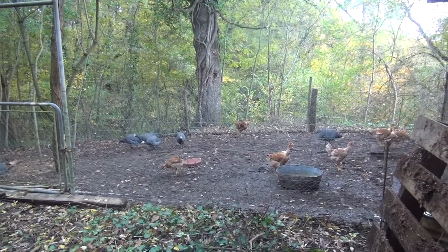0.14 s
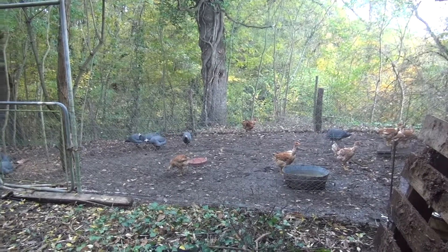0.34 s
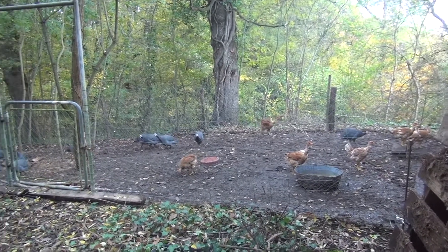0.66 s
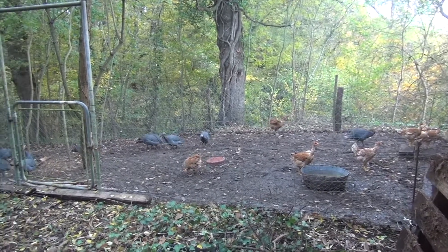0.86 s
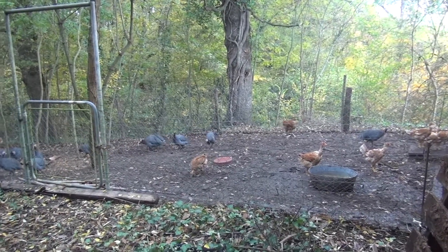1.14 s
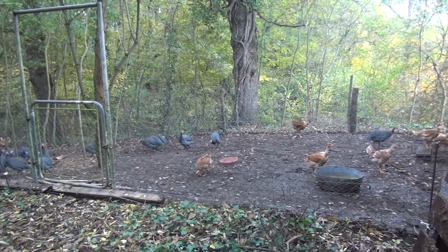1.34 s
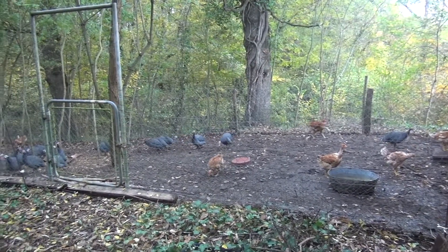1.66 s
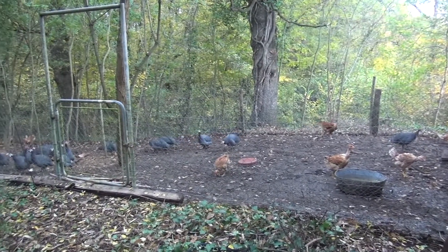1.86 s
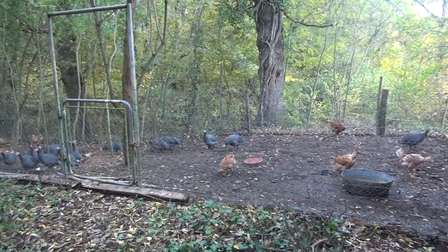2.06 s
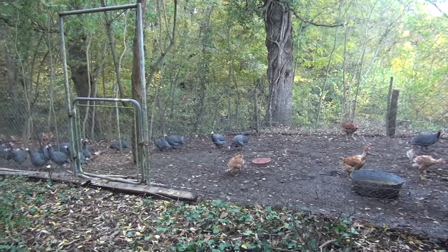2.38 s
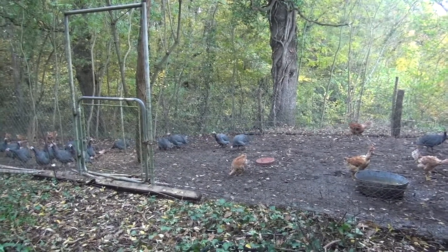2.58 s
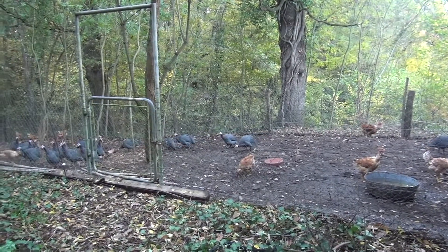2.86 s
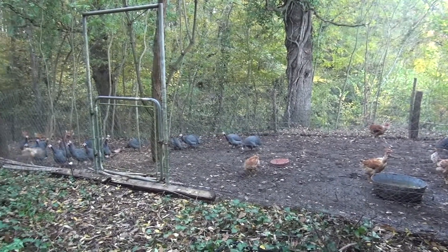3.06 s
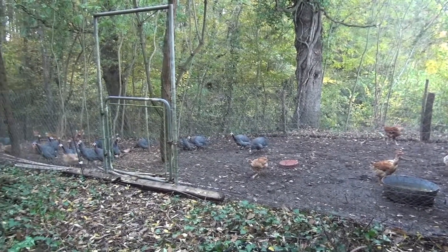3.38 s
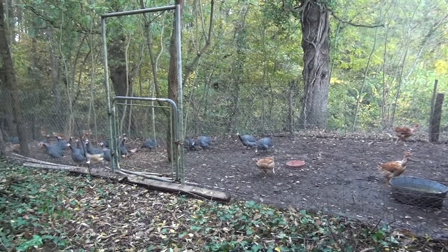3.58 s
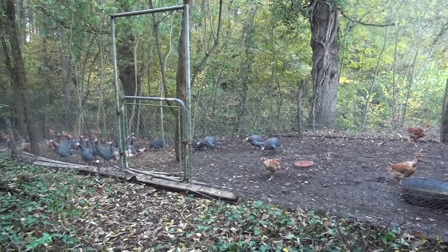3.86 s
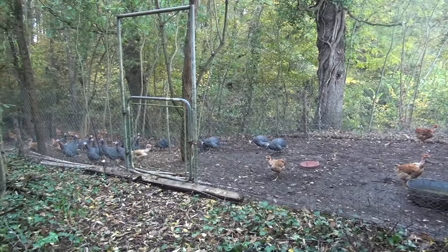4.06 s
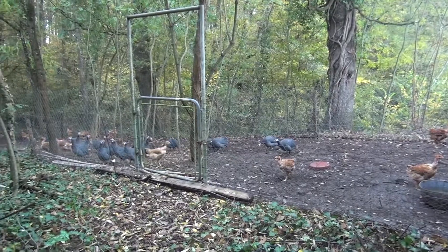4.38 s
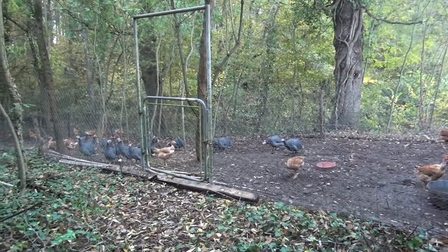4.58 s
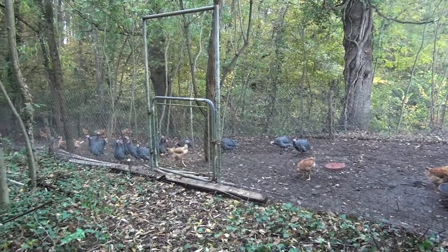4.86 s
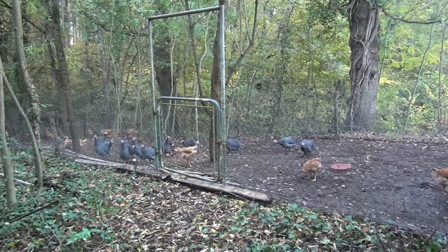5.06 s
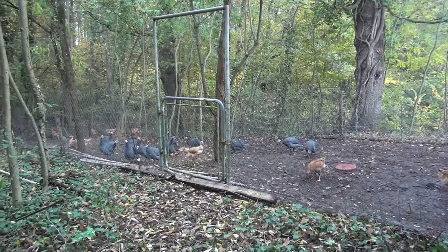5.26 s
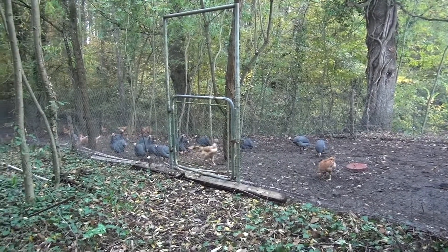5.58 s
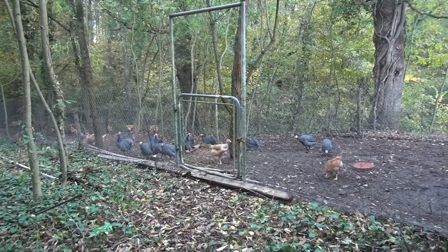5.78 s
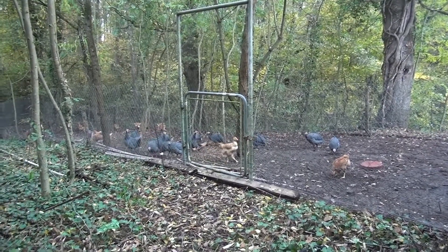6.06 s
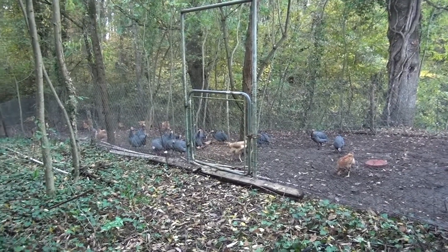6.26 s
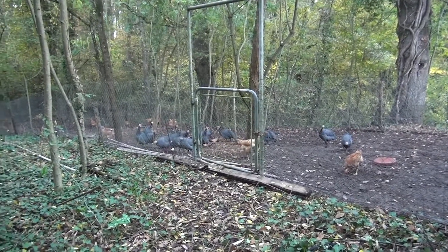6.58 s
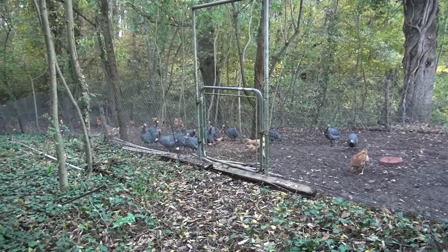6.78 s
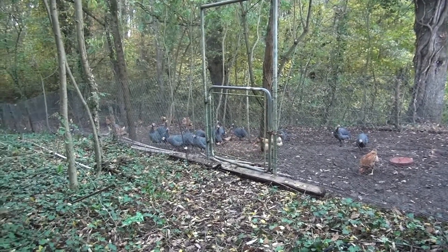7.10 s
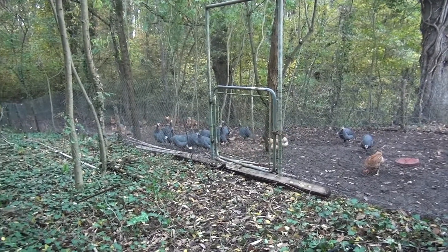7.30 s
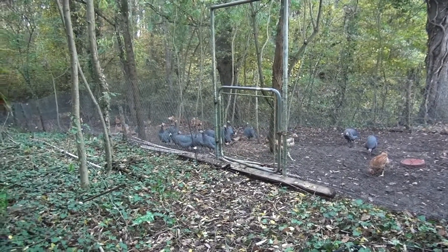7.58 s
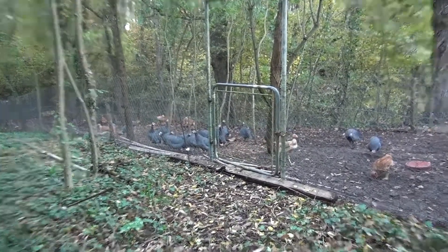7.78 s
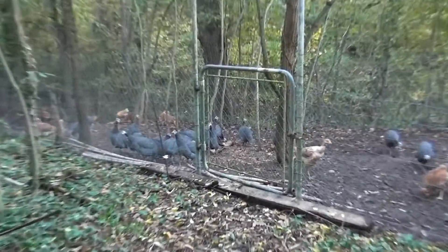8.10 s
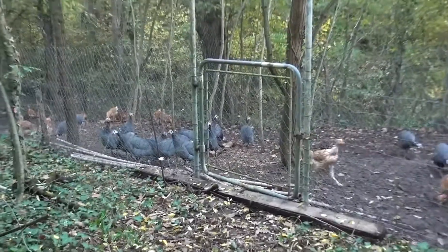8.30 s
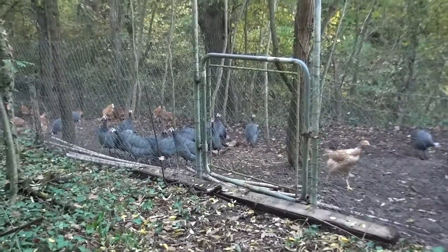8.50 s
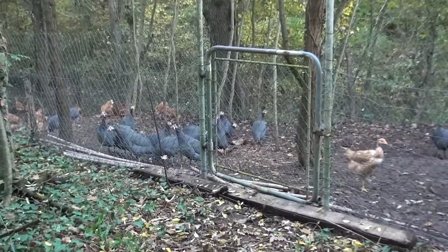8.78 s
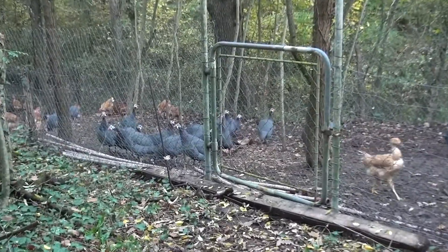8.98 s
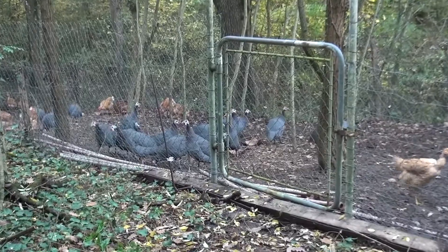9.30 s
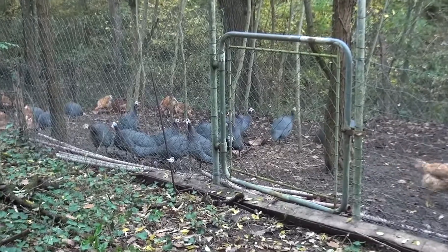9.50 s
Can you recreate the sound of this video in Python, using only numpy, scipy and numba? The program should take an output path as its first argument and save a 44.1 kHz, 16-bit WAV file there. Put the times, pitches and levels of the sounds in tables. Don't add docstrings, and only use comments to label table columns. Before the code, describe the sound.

In a leafy outdoor pen, a guineafowl repeats a sharp, grating chatter almost without stopping, taking only a slightly longer gap near the middle. Gusts flutter against the microphone at the start, then die away. The cries dominate, held to an even loudness, with short reverberation from trunks and a faint wall slap, above quiet far traffic and airy hiss.

```python
import sys
import numpy as np
from scipy import signal
from scipy.fft import rfft, irfft, next_fast_len
from scipy.io import wavfile
from scipy.ndimage import uniform_filter1d
from numba import njit

SR = 44100
rng = np.random.default_rng(int(sys.argv[2]) if len(sys.argv) > 2 else 0)


def store_wav(level_fs):
    pcm = np.round(np.clip(np.atleast_2d(level_fs), -1, 1) * 32767)
    wavfile.write(sys.argv[1], SR, pcm.T.astype(np.int16))


def gain_from_db(level_db):
    decades = np.asarray(level_db, float) / 20
    return 10 ** decades


N = 425124

# start in seconds, level in dB, length in seconds,
# pulse rate in Hz, whistle level in dB.
FIRST_BOUT = [(-0.045, -15.5, 0.053, 300.2, -5), (0.179, -14.5, 0.055, 308.2, -6),
              (0.416, -14.5, 0.059, 311, -5), (0.635, -13.5, 0.058, 313.3, -4),
              (0.882, -15, 0.067, 308.3, -7), (1.144, -12.5, 0.06, 309.2, -10),
              (1.3607, -13, 0.058, 307.4, -8), (1.5814, -11.5, 0.062, 310.8, -8),
              (1.8166, -11.5, 0.063, 310.8, -12), (2.0514, -13, 0.072, 300, -12),
              (2.2665, -14.5, 0.067, 303.7, -8.5), (2.4943, -13.5, 0.066, 300.4, -10),
              (2.75, -12.5, 0.074, 309.2, -8), (2.99, -14.5, 0.064, 307, -16),
              (3.2408, -13, 0.066, 303.3, -10), (3.5442, -12.5, 0.06, 319.3, -7.5)]
# the same columns, in seconds, dB, seconds, Hz and dB.
SECOND_BOUT = [(3.8853, -14, 0.063, 314.8, -5.5), (4.1402, -13.5, 0.06, 312.8, -8),
               (4.42, -13, 0.063, 313.8, -6.5), (4.6806, -12, 0.061, 308.5, -10),
               (4.9147, -11, 0.065, 307.2, -9), (5.1268, -13, 0.069, 308.5, -5),
               (5.4002, -12.5, 0.07, 302.1, -10.5), (5.6396, -14.5, 0.07, 304.2, -5.5),
               (5.853, -14, 0.074, 299.6, -9.5), (6.076, -16, 0.074, 301, -10.5),
               (6.2937, -15.5, 0.076, 307.5, -12), (6.525, -16.5, 0.071, 316.6, -5),
               (6.7658, -15.5, 0.067, 303.3, -10), (7.0085, -16.5, 0.07, 315.8, -7),
               (7.2448, -17, 0.067, 315.5, -4.5), (7.4697, -17, 0.067, 314.5, -3.5),
               (7.7182, -17.5, 0.075, 312.3, -5), (7.9537, -17, 0.071, 315.9, -4),
               (8.1932, -18.5, 0.07, 313.4, -1.5), (8.425, -16.5, 0.062, 306.3, -11),
               (8.7182, -15, 0.059, 316.4, -6.5), (8.9943, -15, 0.066, 309.2, -6.5),
               (9.2828, -15, 0.071, 294.1, -6), (9.5635, -17, 0.063, 311.8, -9)]


def guineafowl():
    out = np.zeros(next_fast_len(N + SR * 5 // 4, True))
    first_start, *first_cry = FIRST_BOUT[0]
    earlier = [(first_start - .23 * k, *first_cry) for k in range(1, 4)]
    cries = earlier + list(FIRST_BOUT) + list(SECOND_BOUT)
    for row, chance in zip(cries, rng.standard_normal((len(cries), 9))):
        sound = cry(*row, chance)
        begin = SR + round(row[0] * SR) - SR // 32
        out[begin:begin + len(sound)] += sound
    return out


# time in seconds, turn towards the microphone from 0 to 1,
# beak opening in dB, whistle pitch in Hz.
HEAD = [(.18, 0.3, -3, 1345), (.64, 0.03, -2, 1349), (.88, 0.22, 0.5, 1408), (1.14, 0.26, -1.5, 1404),
        (1.36, .4, -1.5, 1344), (1.82, 0.67, -2.8, 1428), (2.27, 0.32, -2.2, 1418),
        (2.75, 0.39, -2.5, 1410), (3.24, 0.47, -2, 1390), (3.7, 0.37, 1, 1417), (4.14, 0.27, -1.5, 1425),
        (4.68, 0.62, -3, 1450), (5.4, 0.54, -2.4, 1405), (6.29, 1.02, -3.4, 1440), (6.77, 0.89, -2, 1407),
        (8.19, 1, -6, 1438), (8.43, 0.78, -1.5, 1419), (9.56, 0.84, -2, 1425)]
# share of its length, throat level in dB, beak level in dB,
# chest level in dB, sag of the throat tuning in percent.
CRY_COURSE = [
    (-.1, -35, -33, -20, 7.5),
    (.07, -7, -0.5, -20.5, 7),
    (.4, 0, 6, -3, 1.5),
    (.75, 2, 3.5, -5.5, 1.5),
    (.97, -0.5, -6.5, 3.5, -3.5),
    (1.1, -11.5, -20.5, -9.5, -31),
    (1.3, -77, -14, -7.5, -7),
    (1.7, -70, -70, -48, 1),
]
CRY_SCATTER_DB, CRY_SCATTER_TUNING = -1.1, 0.0041
WHISTLE_LASTS_PER_DB, HOLD_BACK_PER_DB = 0.22, 0.66
DRIVE_DB = 12.5


def cry(start, level_db, length, rate_hz, whistle_db, chance):
    t = np.arange(-SR // 32, SR // 8) / SR
    turn, open_db, whistle_hz = along(HEAD, start)
    throat_db, beak_db, chest_db, sag = along(CRY_COURSE, t / length)
    throat_tuning, beak_tuning = CRY_SCATTER_TUNING * chance[:2]
    rasp_more, tilt_more, beak_more, throat_more, hum_more = CRY_SCATTER_DB * chance[2:7]

    pitch, cycles, source, puffs = membrane(t / length, rate_hz)
    closing = np.clip(t / length, 0, 1.2) - .55
    throat_shift = (1.03 - 0.043 * turn + throat_tuning) * (1 + sag / 100)
    throat = throat_voice(source, throat_shift, closing, 3 - 4.5 * turn + throat_more)
    beak = beak_voice(source, 1 + beak_tuning, t, closing, turn, beak_more)
    rasp = rasp_voice(puffs, -11.5 + 18 * turn + tilt_more)

    rattle = gain_from_db(throat_db - open_db / 2) * throat + gain_from_db(beak_db - 0.5 + open_db / 2) * beak
    whistle_t = np.minimum(t, 0) + np.maximum(t, 0) / (1 + WHISTLE_LASTS_PER_DB * max(whistle_db + 5.5, 0))
    hold_back_db = HOLD_BACK_PER_DB * max(whistle_db + 6.5, 0)
    rattle *= gain_from_db(np.interp(whistle_t, [.015, .032], [-hold_back_db, 0]))
    rattle += gain_from_db(beak_db - 24.5 + 11 * turn + rasp_more) * rasp

    hum = gain_from_db(chest_db - 25 - 3.5 * turn + hum_more + 5.5) * stack(pitch, HUM)
    whistle = gain_from_db(whistle_db - 8) * throat_whistle(whistle_t, whistle_hz, cycles, turn)
    tick = beak_tick(t, .8 * throat + beak, chance[7], chance[8])
    whole = rattle + hum + whistle + chirp(t, puffs) + tick
    return gain_from_db(level_db + DRIVE_DB) * signal.windows.tukey(len(t), .1) * whole


ROUGHNESS = [(0, .5), (.4, .46), (.75, .36), (1, .15)]


def membrane(share, rate_hz):
    size = len(share)
    rough, = along(ROUGHNESS, share)
    pitch = rate_hz * (1.05 - 0.087 * np.clip(share, 0, 1.3))
    cycles = np.cumsum(pitch * (1 + .13 * rough * drift(120, size))) / SR
    slaps = np.diff(np.floor(cycles), prepend=0) * gain_from_db(1.1 * rough * rng.standard_normal(size))
    puffs = rms_one(rng.standard_normal(size) * np.exp(-1.6 * (cycles % 1)))
    source = (1 - rough) * rms_one(slaps) + rough * puffs
    return pitch, cycles, source, puffs


# centre in Hz, width in Hz, level in dB.
THROAT = [(829, 153, -16), (1108, 150, -13), (1544, 260, -1), (1795, 96, 0.5), (2175, 169, -3)]


def throat_voice(source, shift, closing, upper_db):
    more_db = [1.5 * closing, 1.3 * closing, 0, -3 * closing, upper_db - 9 * closing]
    return resonate(source, THROAT, shift, more_db, patchy_db=3)


# centre in Hz, width in Hz, level in dB.
BEAK = [(2774, 560, -10), (3334, 275, 2.5), (3908, 202, -3), (4458, 286, -3.5), (4515, 1110, -16.5),
        (5905, 1240, -41)]
# time in seconds, gain in dB.
FLARES = [
    (.033, 5),
    (.052, 6),
]


def beak_voice(source, shift, t, closing, turn, scatter_db):
    flare_db = sum(db * np.exp(-((t - s) / .0045) ** 2) for s, db in FLARES) - 2.5
    main_db = flare_db + 3 - 3 * turn
    upper_db = 1.5 + 4.5 * turn + scatter_db - 1.1 * closing
    more_db = [0, main_db, upper_db / 2, upper_db, upper_db, upper_db]
    return resonate(source, BEAK, shift, more_db, patchy_db=4)


# centre in Hz, width in Hz, level in dB.
RASP = [(7700, 560, -3.5), (8920, 990, -5), (10830, 1220, -7), (12900, 790, -21), (14600, 1500, -21.5)]


def rasp_voice(puffs, tilt_db):
    air = puffs + .5 * rng.standard_normal(len(puffs))
    return resonate(air, RASP, 1, [0, 0, tilt_db, tilt_db, tilt_db], patchy_db=3)


# multiple of its pitch, level in dB.
WHISTLE = [(1, 5), (2, 7), (3, 3.5), (4, -19.5), (6, -14), (7, -18)]
# time in seconds, level in dB, pitch rise in percent.
WHISTLE_COURSE = [
    (-.005, -42, -0.5),
    (.003, 7, 0.5),
    (.025, -5, -1),
    (.036, -33, 2.5),
    (.052, -21, 10),
]


def throat_whistle(t, hz, cycles, turn):
    beat = 1 + np.clip(t / 0.027, 0, .9) * np.cos(2 * np.pi * cycles)
    level_db, rise = along(WHISTLE_COURSE, t)
    glide = hz * (1 + rise / 100 + 0.0079 * drift(62, len(t)))
    tilt_db = -5.5 + 8 * turn
    partials = [(k, db + (k > 2.5) * tilt_db) for k, db in WHISTLE]
    return gain_from_db(level_db) * beat * stack(glide, partials)


# multiple of the pulse rate, level in dB.
HUM = [(1, 4.5), (2, -9.5), (3, 5)]


def stack(hz, partials):
    phase = 2 * np.pi * np.cumsum(hz) / SR
    return np.sqrt(2) * sum(gain_from_db(db) * np.sin(round(k) * phase + k * k) for k, db in partials)


# time in seconds, resonance in Hz, level in dB.
CHIRP = [
    (-.018, 3370, -37),
    (-.011, 3420, -52),
    (-.005, 3070, -5.5),
    (.001, 2260, -8.5),
    (.014, 2280, -9),
    (.03, 2100, -22),
]


def chirp(t, puffs):
    hz, level_db = along(CHIRP, t)
    return gain_from_db(level_db) * resonate(puffs, [(1011, 390, 0)], hz / 1000, [0], patchy_db=4)


TICK_LEAD_S, TICK_DB = .0172, -24
TICK_SCATTER_S, TICK_SCATTER_DB = .0012, 3.5


def beak_tick(t, ringing, late, loud):
    since = t + TICK_LEAD_S + TICK_SCATTER_S * late
    decay = (since > 0) * np.exp(-np.abs(since) / .006)
    return gain_from_db(TICK_DB + TICK_SCATTER_DB * loud) * decay * ringing


EVENNESS = .25


def resonate(x, modes, shift, more_db, patchy_db):
    out = 0
    for k, (hz, width_hz, db) in enumerate(modes):
        r = np.exp(-np.pi * 1.5 * width_hz / SR)
        w = 2 * np.pi * hz * shift / SR * np.ones(len(x))
        gain = gain_from_db(db + more_db[k] + patchy_db * drift(60, len(x)))
        out = out + (-1) ** k * gain * ring(ring(x, w, r), w, r)
    return rms_one(out / uniform_filter1d(out ** 2 + 1e-12, size=500) ** EVENNESS)


@njit
def ring(x, w, r):
    y = np.zeros(len(x))
    for i in range(2, len(x)):
        drive = (1 - r * r) / 2 * (x[i] - x[i - 2])
        y[i] = drive + 2 * r * np.cos(w[i]) * y[i - 1] - r * r * y[i - 2]
    return y


# frequency in Hz, left minus right in dB.
LEFT_DB = [(60, 0.5), (150, 7), (380, 3.5), (950, 6.5), (2380, 0.5), (5980, 3), (15000, 3)]
# frequency in Hz, lead of the left in radians.
LEFT_LEAD = [(0, 1), (1700, -0.75), (2670, -0.51), (4400, 0.38), (6000, -0.9), (8000, -0.32),
             (15200, -0.64)]


def direct(x):
    hz = np.fft.rfftfreq(len(x), 1 / SR)
    half = gain_from_db(at_hz(LEFT_DB, hz) / 2) * np.exp(.5j * at_hz(LEFT_LEAD, hz))
    return np.array([irfft(rfft(x) * half, len(x)), irfft(rfft(x) / half, len(x))])


# level in dB, build-up in seconds, decay by 60 dB in seconds.
TAILS = [
    (-3.5, 0.021, 0.29),
    (-28, .1, 0.53),
]
# delay in seconds, level in dB.
ECHOES = [
    (.087, -17.5),
    (.166, -29),
]
# frequency in Hz, level in dB.
WOODS_COLOUR = [(200, -12.5), (900, -17), (1500, -6.5), (4500, -6.5), (6000, -7), (9000, -14.5),
                (16000, -32)]
WOODS_ALIKE = 0.16


def woods(x):
    t = np.arange(SR * 5 // 4) / SR
    response = np.zeros((2, len(t)))
    for db, build, t60 in TAILS:
        shape = (1 - np.exp(-(t / build) ** 2)) * gain_from_db(-60 * t / t60)
        mid, side = rng.standard_normal((2, len(t)))
        pair = np.sqrt((1 + WOODS_ALIKE) / 2) * mid + np.sqrt((1 - WOODS_ALIKE) / 2) * side * [[1], [-1]]
        response += gain_from_db(db) * pair * shape / np.sqrt(np.sum(shape ** 2))
    for s, db in ECHOES:
        response[:, round(s * SR)] += gain_from_db(db)
    response = gain_from_db([[.8], [-.8]]) * coloured(response, WOODS_COLOUR)
    return signal.fftconvolve(x[None], response, axes=1)[:, :len(x)]


# frequency in Hz, level in dB per Hz.
WIND = [(12, -32), (20, 0), (140, 0.5), (236, -9), (332, -16.5), (406, -20), (800, -31), (1040, -61),
        (1760, -120)]


def wind(t):
    size = 5 * SR // 2
    out = np.zeros((2, N))
    flutter, thump = gusts(t[:size])
    for kind, shared_part, gain in [("low", 1.6, gain_from_db(9) * thump), ("high", .95, gain_from_db(7) * flutter)]:
        shared, *own = rng.standard_normal((3, size))
        noise = coloured(shared_part * shared + np.array(own), WIND)
        band = signal.sosfilt(signal.butter(3, 75, kind, fs=SR, output="sos"), noise)
        band /= uniform_filter1d(np.mean(band ** 2, axis=0), size=2500) ** .35
        out[:, :size] += gain * rms_one(band)
    return out


# start in seconds, length in seconds, flutter level in dB,
# thump above the flutter in dB.
GUSTS = [(0.022, 0.061, -14.5, -15), (0.14, 0.073, -24.5, -1), (0.275, 0.05, -17.5, -9),
         (0.355, 0.046, -29.5, -3), (0.48, .14, -25, -10), (0.655, 0.14, -29, -3), (0.945, 0.21, -40, 2.5),
         (1.196, 0.033, -32, -10), (1.29, 0.048, -26.5, 3.5), (1.427, 0.091, -31, 7),
         (1.585, 0.17, -38.5, 0), (1.91, .06, -41, 4)]
GUST_RISE_DB_S, GUST_FALL_DB_S, GUST_SAG_DB_S = 500, 300, 12


def gusts(t):
    s, length, flutter_db, thump_db = np.array(GUSTS).T[:, :, None]
    since = t - s
    rise_db = GUST_RISE_DB_S * np.minimum(since, 0)
    sag_db = GUST_SAG_DB_S * np.maximum(since, 0)
    fall_db = GUST_FALL_DB_S * np.maximum(since - length, 0)
    shape = gain_from_db(flutter_db + rise_db - sag_db - fall_db)
    return shape.sum(axis=0), (shape * gain_from_db(thump_db)).sum(axis=0)


# time in seconds, level in dB.
RUMBLE = [(0.0, -43.5), (.4, -44), (1.7, -40), (2.15, -41.5), (4.3, -42.5), (5.3, -40.5), (6.2, -44.5),
          (8.3, -46.5), (9.4, -44), (9.64, -43)]
# frequency in Hz, level in dB per Hz.
AIR = [(15, -36), (30, -9), (100, -2), (200, -6.5), (450, -14.5), (1000, -12), (3000, -18.5), (6500, -28),
       (11000, -35), (16000, -41)]
# frequency in Hz, left-right likeness from 0 to 1.
AIR_ALIKE = [(30, 0.99), (300, 0.98), (1500, 0.31), (6000, 0.089), (10000, 0.64)]


def far_air(t):
    size = next_fast_len(N, True)
    swell_db = 1.3 * drift(5, N)
    hz = np.fft.rfftfreq(size, 1 / SR)
    alike = np.clip(at_hz(AIR_ALIKE, hz), 0, 1)
    mid, side = rfft(rng.standard_normal((2, size))) * gain_from_db(at_hz(AIR, hz))
    pair = irfft(np.sqrt(1 + alike) * mid + np.sqrt(1 - alike) * side * [[1], [-1]], size)[:, :N]
    return gain_from_db(along(RUMBLE, t)[0] + 14 + swell_db) * rms_one(pair)


def rms_one(x):
    return x / np.sqrt(np.mean(x ** 2) + 1e-20)


def along(rows, t):
    first, *columns = np.transpose(rows)
    return [np.interp(t, first, c) for c in columns]


def at_hz(points, hz):
    point_hz, values = np.array(points).T
    return np.interp(np.log(hz + 1), np.log(point_hz + 1), values)


def coloured(x, points):
    hz = np.fft.rfftfreq(x.shape[-1], 1 / SR)
    return irfft(rfft(x) * gain_from_db(at_hz(points, hz)), x.shape[-1])


def drift(rate, size):
    r = np.exp(-2 * np.pi * rate / SR)
    settle = SR // 20
    noise = rng.standard_normal(size + settle)
    return rms_one(signal.lfilter([1], [1, -2 * r, r * r], noise)[settle:])


def scene():
    t = np.arange(N) / SR
    bird = guineafowl()
    return (direct(bird) + woods(bird))[:, SR:SR + N] + wind(t) + far_air(t)


def band_limit(x):
    return signal.sosfilt(signal.butter(12, 15700, fs=SR, output="sos"), x)


KNEE_DB, SQUEEZE, RELEASE_DB_S = -17, .6, 40


def record(dry):
    level_db = 10 * np.log10(uniform_filter1d(np.mean(dry ** 2, axis=0), size=320) + 1e-12)
    ramp = RELEASE_DB_S * np.arange(N) / SR
    held_db = np.maximum.accumulate(np.maximum(level_db, KNEE_DB) + ramp) - ramp
    over_db = SQUEEZE * np.maximum(held_db - KNEE_DB, 0)
    cut_db, _ = signal.lfilter([.02], [1, -.98], over_db, zi=[over_db[0]])
    x = dry * gain_from_db(-cut_db)
    x = x / (1 + np.abs(x) ** 6) ** (1 / 6)
    x = signal.sosfilt(signal.cheby2(12, 50, 16050, fs=SR, output="sos"), x)
    return band_limit(x)


dry = scene()
out = record(dry)
store_wav(out)
```